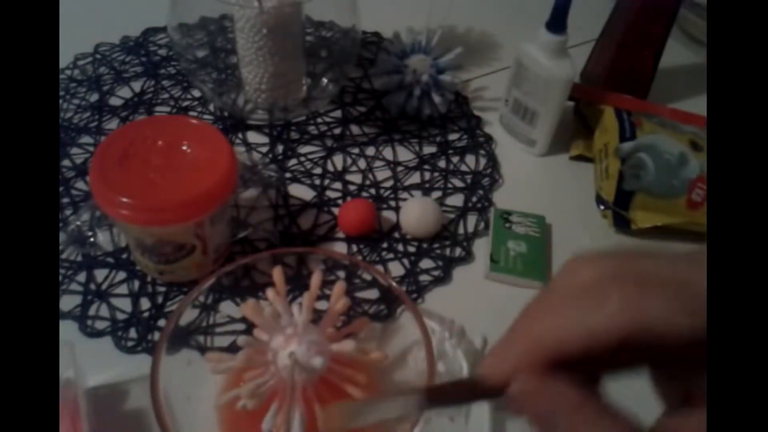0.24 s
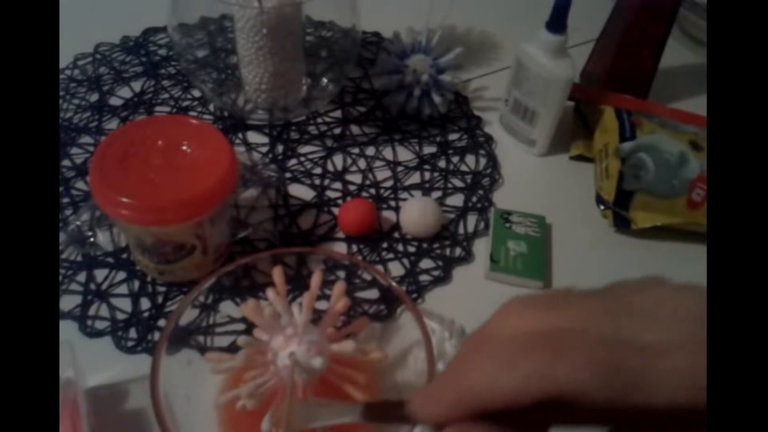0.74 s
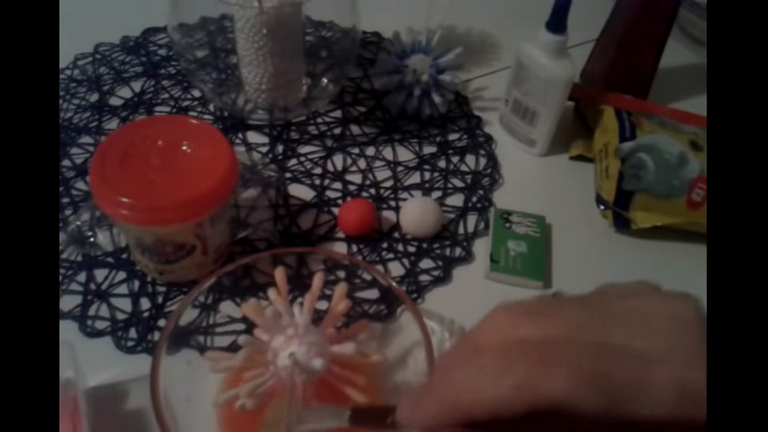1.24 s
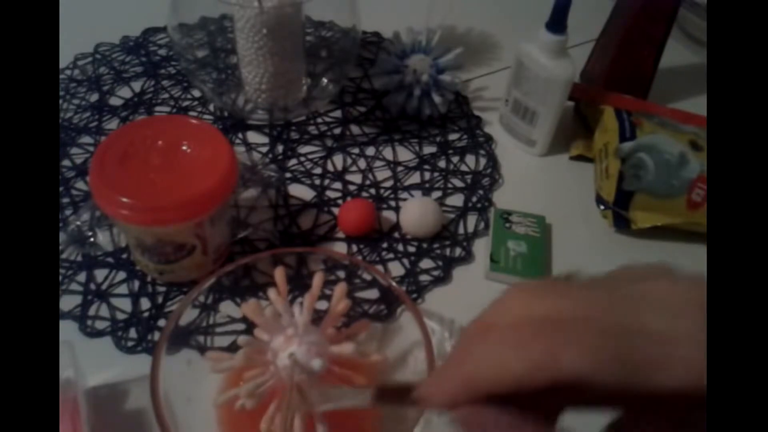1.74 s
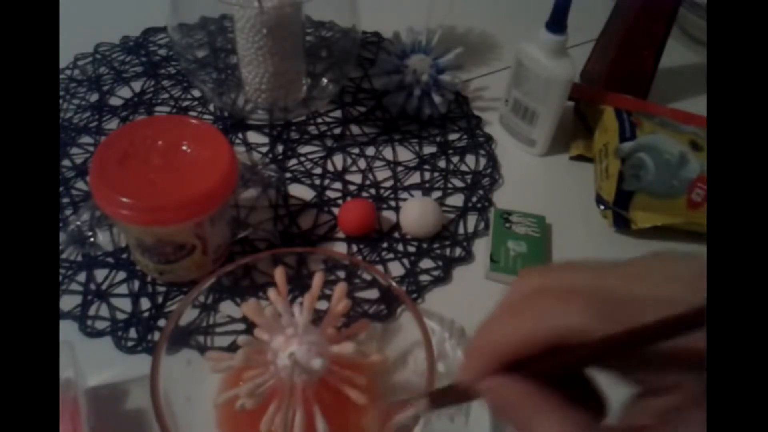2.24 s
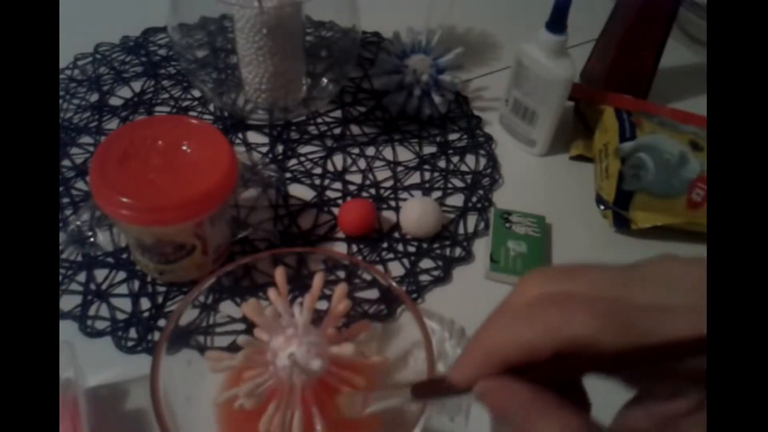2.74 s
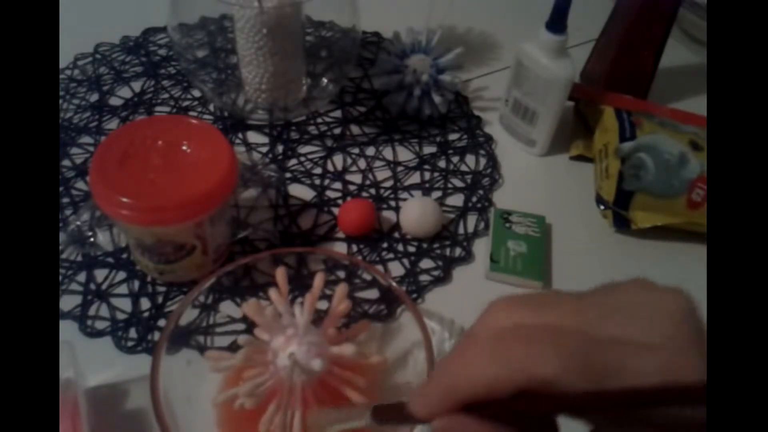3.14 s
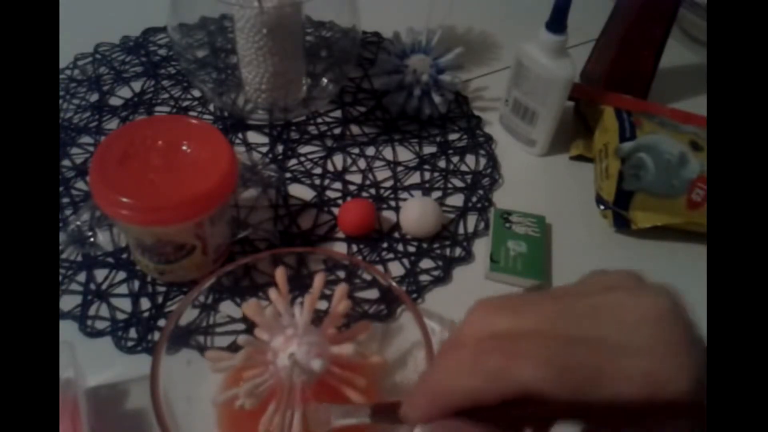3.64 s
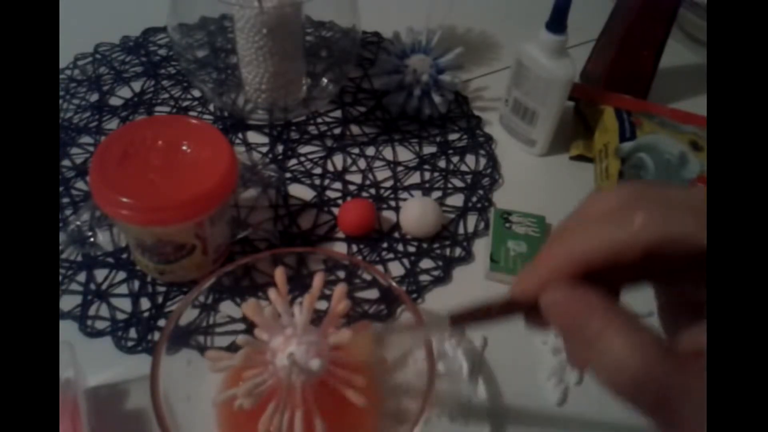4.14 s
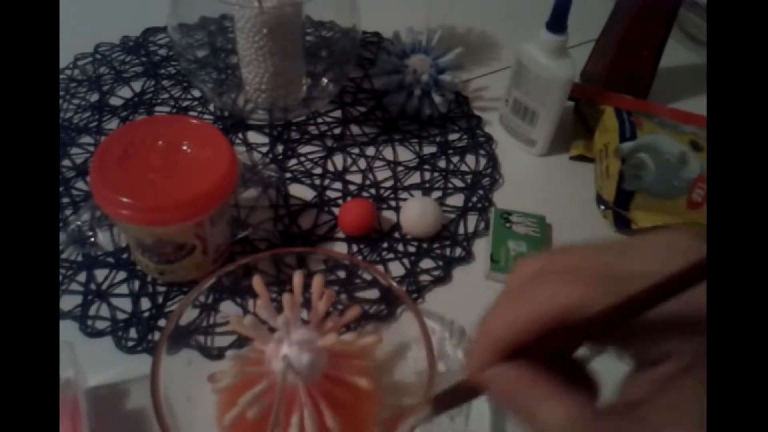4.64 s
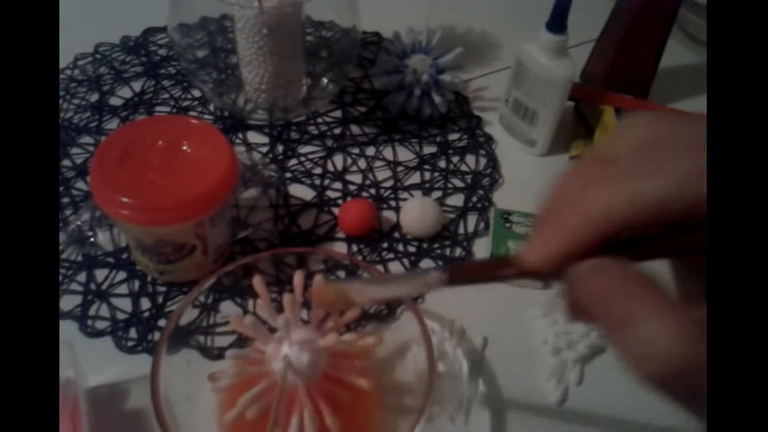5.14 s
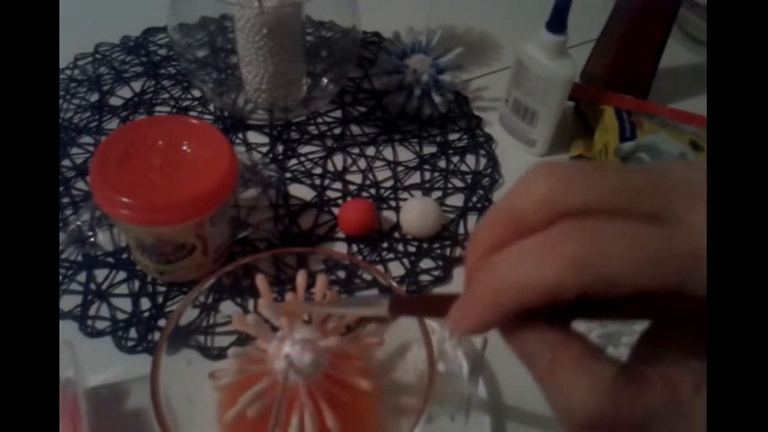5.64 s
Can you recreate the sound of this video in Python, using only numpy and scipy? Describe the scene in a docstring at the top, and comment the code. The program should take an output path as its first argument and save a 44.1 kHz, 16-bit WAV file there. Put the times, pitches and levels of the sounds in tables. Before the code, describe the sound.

A paintbrush swishes softly and once clinks against a glass bowl, over faint clock ticks and microphone hiss.

```python
"""A paintbrush dabs at a craft piece in a glass bowl of water on a table, close to the microphone.
Its bristles slip and swish in light dabs and firm strokes, its tip ticks, and a hand shifts on the table.
Once the brush knocks the rim and bounces: the table thumps, the glass rings. A clock ticks faintly across
the small room, over low rumble and a microphone hiss that a noise suppressor lets up with loud sounds."""
import sys
import numpy as np
from scipy import signal
from scipy.fft import rfft, irfft
from scipy.io import wavfile

SR = 44100
rng = np.random.default_rng(int(sys.argv[2]) if len(sys.argv) > 2 else 0)


def to_wav(s):
    """Save 16-bit WAV."""
    ch = np.atleast_2d(s).T  # columns
    pcm = np.round(np.clip(ch, -1, 1) * 32767)  # PCM
    wavfile.write(sys.argv[1], SR, pcm.astype(np.int16))


N = 259308
TIME = np.arange(N) / SR


def from_db(db):
    return 10 ** (np.asarray(db) / 20)


def unit_rms(x):
    return x / np.sqrt(np.mean(x ** 2) + 1e-20)


def coloured(x, spectrum):
    """Shapes x by rows of (Hz, dB); rms 1."""
    hz, db = np.transpose(spectrum)
    bins_hz = np.maximum(np.fft.rfftfreq(N, 1 / SR), 1)
    gain_db = np.interp(np.log(bins_hz), np.log(hz), db)
    return unit_rms(irfft(rfft(x) * from_db(gain_db), N))


def noise(spectrum):
    """Coloured Gaussian noise; rms 1."""
    return coloured(rng.standard_normal(N), spectrum)


def resonate(x, hz, width_hz):
    """Two-pole resonance, peak gain 1."""
    radius = np.exp(-np.pi * width_hz / SR)
    zeros = np.array([1, 0, -1]) * (1 - radius ** 2) / 2
    poles = [1, -2 * radius * np.cos(2 * np.pi * hz / SR), radius ** 2]
    return signal.lfilter(zeros, poles, x + 1e-18)


def decay(start_s, t60_s):
    """Jumps to 1, then falls 60 dB in t60_s."""
    return (TIME >= start_s) * np.exp(-np.log(1000) * np.clip((TIME - start_s) / t60_s, 0, 10))


def struck(start_s, build_s, t60_s):
    """Decay with a gradual onset."""
    return decay(start_s, t60_s) * (1 - decay(start_s, build_s))


def swell(start_s, rise_s):
    """Eases up to 1, then fades more slowly."""
    age = np.clip((TIME - start_s) / rise_s, 0, 20)
    return (age * np.exp(1 - age)) ** 4


def bump(centre_s, half_s):
    """Flat-topped envelope."""
    return np.exp(-np.minimum(np.abs(TIME - centre_s) / half_s, 3) ** 4)


# Hiss spectrum. Each row: frequency in Hz, relative density in dB.
HISS_SPECTRUM = [(30, -18), (400, -5.5), (900, -8), (2000, -7.5), (4000, -8), (5500, -5.5), (6800, -4),
                 (7300, -0.5), (8100, -1), (8800, -4.5), (11000, -4), (15500, -7)]
# Whistles in the hiss. Each row: frequency in Hz, level in dB before lift and waver.
WHISTLES = [(5593, -80.5), (7058, -70.5), (7106, -72.5), (7300, -71), (7887, -70.5)]
# Spectrum of the hiss level's waver. Each row: rate in Hz, relative density in dB.
WAVER_SPECTRUM = [(1, -6), (3, 0), (8, -4), (30, -40), (100, -100)]
# Brief dips of the hiss. Each row: centre in seconds, gain in dB.
HISS_DIPS = [(.415, -2.5), (.71, -2), (1.84, -2.5), (5.435, -5)]

def microphone_hiss(lift_db, hiss_db=-58, waver_db=0.5):
    """Hiss with thin whistles; the level wavers slowly and dips briefly."""
    whistles = sum(from_db(db) * unit_rms(resonate(rng.standard_normal(N), hz, width_hz=12))
                   for hz, db in WHISTLES)
    dips_db = sum(db * bump(centre_s, half_s=0.036) for centre_s, db in HISS_DIPS)
    gain_db = lift_db + waver_db * noise(WAVER_SPECTRUM) + dips_db
    return from_db(gain_db) * (from_db(hiss_db) * noise(HISS_SPECTRUM) + whistles)


def suppressor_lift_db(sound, range_db=8, threshold_db=-42, knee_db=4.5, follow_s=0.022):
    """The noise suppressor lets the hiss up while the sound is above its threshold."""
    pole = np.exp(-1 / (follow_s * SR))
    power = signal.lfilter([1 - pole], [1, -pole], sound ** 2)
    over_db = 10 * np.log10(power + 1e-12) - threshold_db
    return range_db * (1 + np.tanh(over_db / (2 * knee_db))) / 2


# Rumble spectrum. Each row: frequency in Hz, relative density in dB.
RUMBLE_SPECTRUM = [(25, -28.5), (38, -16.5), (47, 3.5), (62, -11), (80, -10), (105, -3), (135, 1.5),
                   (170, -5), (280, -2.5), (450, -12.5), (800, -20.5), (2000, -53)]

def rumble(level_db=-74):
    """Steady low noise of the room."""
    return from_db(level_db) * noise(RUMBLE_SPECTRUM)


# Runs of light dabs. Each row: start in seconds, end in seconds.
DAB_RUNS = [(0.005, .34), (.53, .56), (.76, .8), (3.215, 3.32), (3.65, 3.77)]

def dabs(gap_s=0.07, jitter_s=0.0057, length_s=0.039, level_db=-53.5, spread_db=0.9):
    """Quick, uneven dabs, returned as stroke rows."""
    starts_s = np.concatenate([np.arange(start_s, end_s, gap_s) for start_s, end_s in DAB_RUNS])
    draws = rng.standard_normal((len(starts_s), 2))
    return [(start_s + jitter_s * late, length_s, level_db + spread_db * firm)
            for start_s, (late, firm) in zip(starts_s, draws)]


# Firm strokes. Each row: start in seconds, length in seconds, level in dB.
FIRM_STROKES = [(.886, .07, -50.5), (1.113, 0.057, -52.5), (1.168, 0.053, -47.5), (1.379, 0.03, -49),
                (1.436, 0.052, -46.5), (1.527, .035, -50), (1.738, .037, -47), (2.019, 0.024, -45),
                (2.515, .06, -45.5), (3.322, 0.068, -51), (3.531, .03, -48), (3.916, 0.034, -47.5),
                (4.236, 0.05, -45), (4.298, .05, -50), (4.37, .05, -46), (5.538, 0.048, -50.5),
                (5.626, 0.061, -50.5)]
# Swish spectrum. Each row: frequency in Hz, relative density in dB.
SWISH_SPECTRUM = [(200, -20), (1000, -21), (3000, -16), (5800, -12.5), (7200, -2), (8300, -0.5),
                  (9800, -10), (15500, -12)]

def bristles(slips_per_s=6000, spread_db=2.0, press_share=0.17):
    """Thousands of hairs slip one by one while the brush presses."""
    power = np.zeros(N)
    for start_s, length_s, db in list(FIRM_STROKES) + dabs():
        age = np.clip((TIME - start_s) / length_s, 0, 4)
        press = 1 - np.exp(-age / press_share)
        release = np.exp(-age ** 2)
        power += (from_db(db) * press * release) ** 2
    slips = (rng.random(N) < slips_per_s / SR) * rng.standard_normal(N)
    sizes = from_db(spread_db * np.minimum(rng.exponential(1, N), 4))
    return np.sqrt(power) * coloured(slips * sizes, SWISH_SPECTRUM)


# Clock spectrum, blurred by the room. Each row: frequency in Hz, relative density in dB.
CLOCK_SPECTRUM = [(200, -23), (600, -3.5), (1100, -1.5), (2000, 0), (3000, -6.5), (4400, -3.5),
                  (7000, -5.5), (15000, -17)]

def clock(first_s=0.485, limp_s=0.014, level_db=-57.5, accent_db=6):
    """One tick a second arrives mostly off the walls, as a soft puff."""
    envelope = np.zeros(N)
    for k in range(N // SR + 1):
        start_s = first_s + k + limp_s * (k % 2)
        tick_db = level_db + accent_db * (k == 2)
        envelope += from_db(tick_db) * swell(start_s, rise_s=0.061)
    return envelope * noise(CLOCK_SPECTRUM)


# Hand shifts. Each row: centre in seconds, band frequency in Hz, level in dB.
HAND_SHIFTS = [(1.42, 362, -74), (3.3, 290, -68.5), (4.29, 294, -71.5), (5.22, 145, -69.5),
               (5.565, 367, -67.5)]

def hand():
    """Skin and sleeve drag on the table top, which answers in one low band."""
    out = np.zeros(N)
    for centre_s, hz, db in HAND_SHIFTS:
        murmur = unit_rms(resonate(noise(RUMBLE_SPECTRUM), hz, width_hz=hz / 4))
        out += from_db(db) * bump(centre_s, half_s=0.073) * murmur
    return out


# Resonances that colour each tick. Each row: frequency in Hz, width in Hz, relative gain in dB.
TICK_RESONANCES = [(2550, 370, -16), (7700, 1030, 1.5), (12670, 5800, -9)]

def tick_ring(clicks):
    """Clicks ring brightly for a few cycles; the resonances alternate in sign."""
    return sum((-1) ** k * from_db(db) * resonate(clicks, hz, width_hz)
               for k, (hz, width_hz, db) in enumerate(TICK_RESONANCES))


# Ticks of the brush tip. Each row: time in seconds, peak in dB.
TIP_TICKS = [(1.7455, -36), (2.0291, -18.5), (3.324, -22), (3.3266, -6), (4.241, -26), (4.2539, -22),
             (4.393, -32)]
# Table thud spectrum. Each row: frequency in Hz, relative density in dB.
THUD_SPECTRUM = [(30, -1), (120, -3), (320, 1.5), (600, -7), (2000, -6), (5000, -17), (10000, -35)]

def tip_ticks(thud_gain_db=-49, thud_t60_s=0.21):
    """Each sharp tick rings briefly and nudges the table."""
    clicks, thud = np.zeros((2, N))
    for start_s, db in TIP_TICKS:
        clicks[round(start_s * SR)] = from_db(db)
        thud += from_db(db + thud_gain_db) * decay(start_s, thud_t60_s)
    impulse_peak = np.abs(tick_ring(signal.unit_impulse(N))).max()
    return tick_ring(clicks) / impulse_peak + thud * noise(THUD_SPECTRUM)


# Knocks on the rim. Each row: start in seconds, then relative ring, wash and crack levels in dB.
RIM_KNOCKS = [(4.7033, -5, -22.5, -3), (4.7316, -10.5, -22.5, -32), (4.745, -18, -53.5, -29),
              (4.7640, -18, -59.5, -40.5), (4.8090, -25.5, -38.5, -48)]
# Modes of the knock: low table thump and high glass ring.
# Each row: frequency in Hz, relative level in dB, T60 in seconds.
KNOCK_MODES = [(94, -50, .35), (519.5, -28.5, 0.048), (570, -29, 0.051), (918, -40, 0.27),
               (1922, -43.5, 0.28), (2318, -34, 0.34), (2348, -33, 0.35), (4140, -13, 0.18),
               (4150, -23, 0.26), (6367, 2.5, 0.24), (6470, -14, 0.27), (6380, -15, 0.38), (8850, -21, 0.2),
               (8963, -28.5, 0.19), (8930, -13.5, .21), (11941, -25, 0.15), (15220, -30.5, .14)]
# Spectrum of the ring's flutter. Each row: rate in Hz, relative density in dB.
FLUTTER_SPECTRUM = [(5, -12), (15, 0), (35, -3), (100, -22), (400, -90)]

def knock_ring(gain_db=-6, build_s=0.0068, choke_s=0.0017, flutter_db=3.5):
    """Each knock adds swing to the table and glass modes; close pairs beat and the ring flutters."""
    ring = np.zeros(N)
    age_s = np.maximum(TIME - RIM_KNOCKS[0][0], 0)
    for hz, mode_db, t60_s in KNOCK_MODES:
        swing = sum(from_db(db) * struck(start_s, build_s, t60_s) for start_s, db, _, _ in RIM_KNOCKS)
        flutter = from_db(flutter_db * noise(FLUTTER_SPECTRUM))
        ring += from_db(mode_db) * swing * flutter * np.sin(2 * np.pi * hz * age_s)
    # The returning brush mutes the ring just before the second knock.
    mute_s = RIM_KNOCKS[1][0] - choke_s
    choke = np.exp(-((TIME - mute_s) / choke_s) ** 2)
    return from_db(gain_db) * ring * (1 - choke)


# Dense overtones of bowl, brush and table. Each row: frequency in Hz, relative density in dB.
CLATTER_SPECTRUM = [(30, -46), (90, -30), (250, -17.5), (500, -16.5), (750, -22.5), (1300, -22),
                    (2000, -16), (2800, -13.5), (5300, -13), (6300, 1), (7200, 1.5), (8000, 3.5),
                    (9100, -3), (10200, -23), (15500, -27)]

def clatter(crack_gain_db=-8):
    """Each rim knock opens with a contact crack, then spreads into a wash of overtones."""
    envelope = np.zeros(N)
    for start_s, _, wash_db, crack_db in RIM_KNOCKS:
        envelope += from_db(crack_db + crack_gain_db) * struck(start_s, build_s=0.001, t60_s=0.01)
        envelope += from_db(wash_db) * struck(start_s, build_s=0.021, t60_s=0.29)
    return envelope * noise(CLATTER_SPECTRUM)


def diffuse_tail(start_s, t60_s, level_db):
    """Impulse response of dense reflections: decaying noise."""
    tail = rng.standard_normal(SR) * decay(start_s, t60_s)[:SR]
    return from_db(level_db) * tail / np.sqrt(np.sum(tail ** 2))


# Echoes off nearby walls. Each row: delay in seconds, gain in dB.
WALL_ECHOES = [(.0087, -22), (.0156, -21.5), (.027, -22)]

def room(x):
    """Things on the table scatter the sound at once; wall echoes and a diffuse tail follow."""
    response = diffuse_tail(start_s=0.001, t60_s=0.027, level_db=-19)
    response += diffuse_tail(start_s=WALL_ECHOES[0][0], t60_s=0.39, level_db=-13.5)
    for delay_s, db in WALL_ECHOES:
        response[round(delay_s * SR)] += from_db(db)
    return x + signal.fftconvolve(x, response)[:N]


def scene():
    """Brush and bowl in the room, plus hand, clock, hiss and rumble; mono."""
    craft = room(knock_ring() + clatter() + tip_ticks() + bristles())
    mix = craft + hand() + clock() + microphone_hiss(suppressor_lift_db(craft)) + rumble()
    return mix[None]


def record(dry, ceiling=0.98, cutoff_hz=15750):
    """Soft clip at twice the sample rate, then a steep low-pass."""
    oversampled = signal.resample_poly(dry, 2, 1, axis=-1)
    rounded = ceiling * np.tanh(oversampled / ceiling)
    lowpass = signal.ellip(10, 0.1, 80, cutoff_hz, fs=SR, output="sos")
    return signal.sosfilt(lowpass, signal.resample_poly(rounded, 1, 2, axis=-1))


dry = scene()
out = record(dry)
to_wav(out)
```